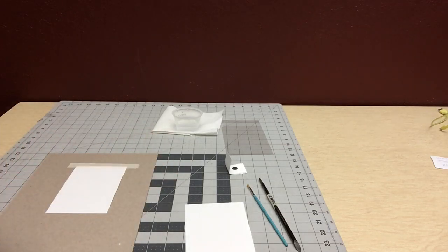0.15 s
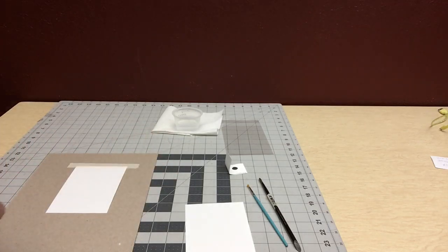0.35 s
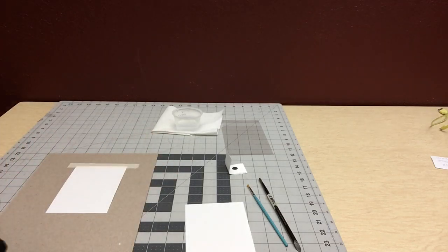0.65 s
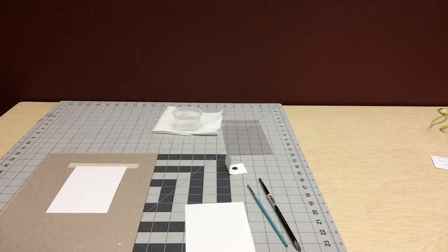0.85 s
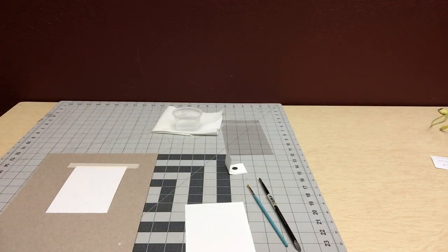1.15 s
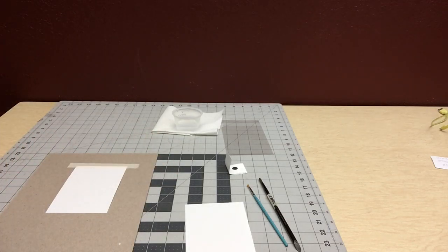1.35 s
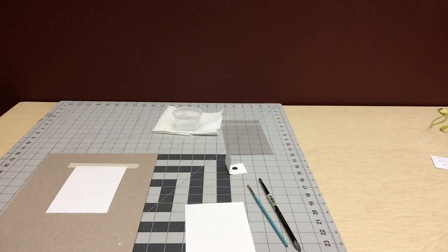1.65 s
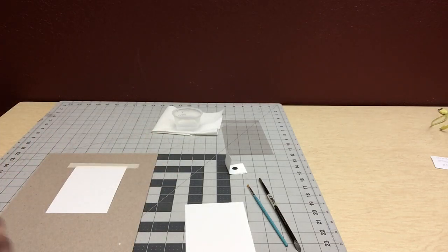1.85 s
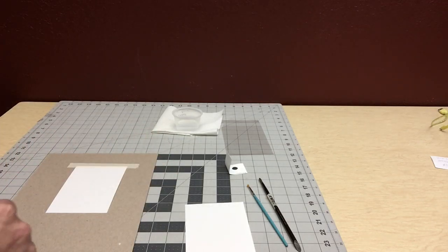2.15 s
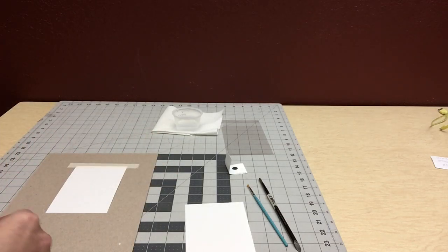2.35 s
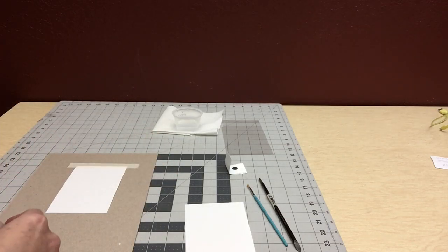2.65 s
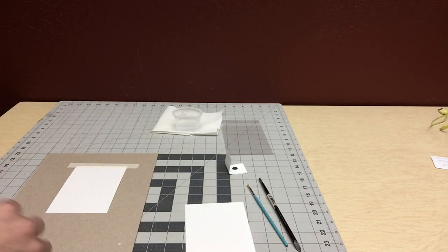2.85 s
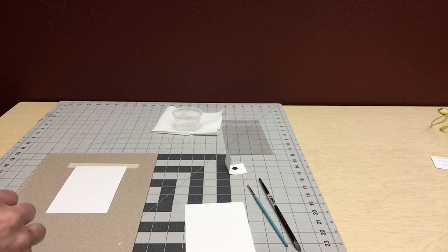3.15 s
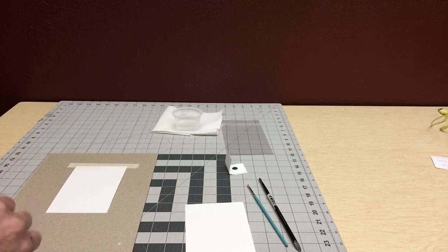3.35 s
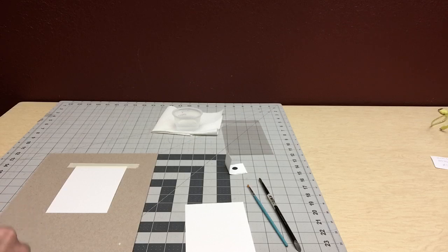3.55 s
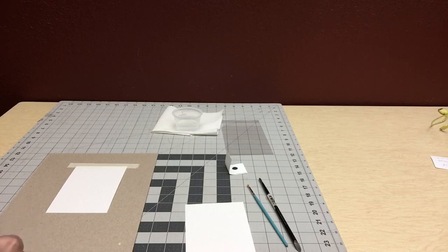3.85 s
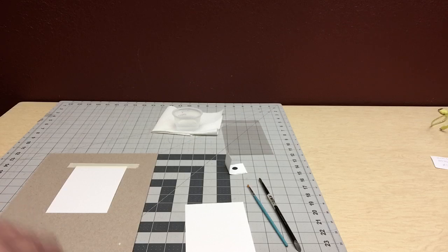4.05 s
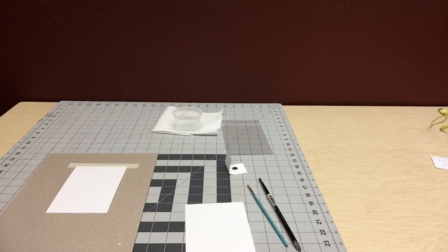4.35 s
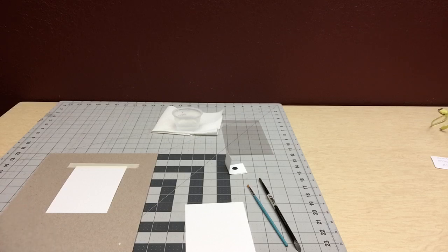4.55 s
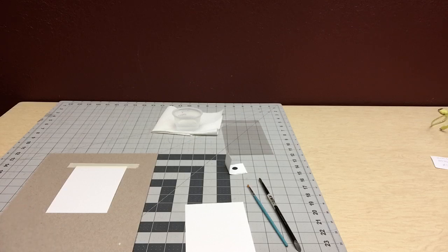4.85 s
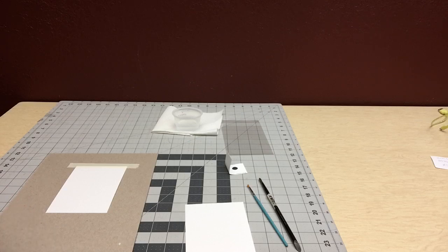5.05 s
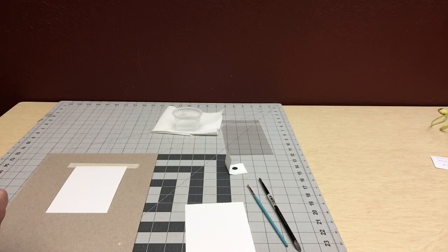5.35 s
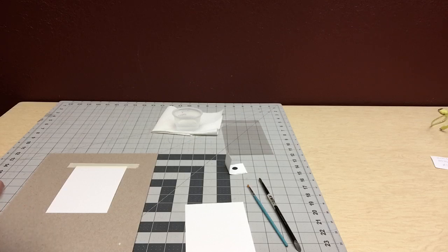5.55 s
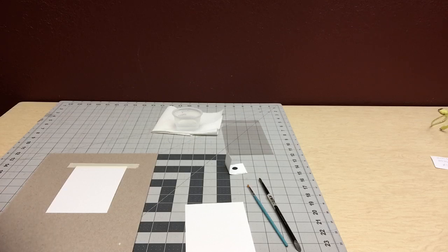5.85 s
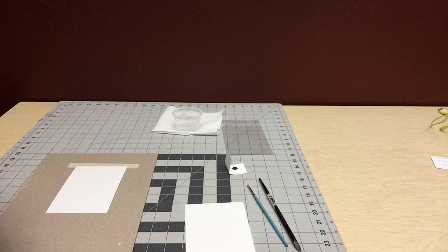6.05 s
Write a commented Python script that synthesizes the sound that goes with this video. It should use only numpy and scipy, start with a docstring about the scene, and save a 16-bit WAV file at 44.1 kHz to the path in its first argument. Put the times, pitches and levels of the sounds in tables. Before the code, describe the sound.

In a small quiet room with a faint low fan hum, masking tape is handled at close range. Light rustles and ticks lead to a bright double rip, the loudest moment, then a dry run of crackling pulls and pops for about a second. The rest is sparse: gentle finger strokes on tape and board, a soft knock, scattered clicks and a short springy flick.

```python
"""Ventilation hums low; close to the microphone a palm and fingers brush tape and board, with small ticks.
Then masking tape is torn and pulled off its roll in short crackling tugs, laid on a board and rubbed down.
Showers of tiny slips make the peeling, tearing and rubbing; short noise bursts make snaps and a few echoes.
Decaying partials make the papery pops, the flick of the stiff strip and the knocks on the board.
The table top and a small room answer tape, hands, flick and snaps."""
import sys
import numpy as np
from scipy import signal
from scipy.fft import rfft, irfft, next_fast_len
from scipy.io import wavfile
from scipy.ndimage import uniform_filter1d, map_coordinates

SR = 44100
rng = np.random.default_rng(int(sys.argv[2]) if len(sys.argv) > 2 else 0)


def store_wav(level_fs):
    """Save 16-bit WAV to argv[1]."""
    pcm = np.round(np.clip(np.atleast_2d(level_fs), -1, 1) * 32767)
    wavfile.write(sys.argv[1], SR, pcm.T.astype(np.int16))


N = 273480  # length in samples


def from_db(db):
    """Decibels to gain."""
    return 10 ** (np.asarray(db) / 20)


def rms_one(x):
    """Scale to unit rms."""
    return x / np.sqrt(np.mean(x ** 2) + 1e-20)


def at_hz(points, hz):
    """Read a table along a log-frequency axis."""
    knots, values = np.transpose(points)
    return np.interp(np.log(np.maximum(hz, 1)), np.log(knots), values)


def add(track, s, sound):
    """Mix a sound into a track from time s on."""
    i = int(np.clip(round(s * SR), 0, N - 1))
    track[i:i + len(sound)] += sound[:N - i]


def coloured(x, spectrum):
    """Causal (minimum-phase) filter with the given (Hz, dB) response, by folding the cepstrum."""
    size = 2 * next_fast_len(len(x) // 2 + 512)
    gain = from_db(at_hz(spectrum, np.fft.rfftfreq(size, 1 / SR)))
    cepstrum = irfft(np.log(gain))
    cepstrum[1:size // 2] *= 2
    cepstrum[size // 2 + 1:] = 0
    response = np.exp(rfft(cepstrum))
    return irfft(rfft(x, size) * response)


def resonance(x, hz, width_hz):
    """Two-pole resonance with gain 1 on top."""
    r = np.exp(-np.pi * width_hz / SR)
    zeros = np.array([1, 0, -1]) * (1 - r * r) / 2
    poles = [1, -2 * r * np.cos(2 * np.pi * hz / SR), r * r]
    return signal.lfilter(zeros, poles, x)


def drift(rate):
    """Random wander of rms 1, with rate turning points drawn a second."""
    knots = rng.standard_normal(4000)
    return rms_one(np.interp(np.arange(N) / SR * rate, np.arange(len(knots)), knots))


def decaying(hz, db, t60):
    """One partial that starts at once and falls by 60 dB in t60 seconds."""
    t = np.arange(SR // 2) / SR
    return from_db(db) * np.sin(2 * np.pi * hz * t) * np.exp(-np.log(1000) * t / t60)


def struck(blows, modes):
    """Each blow (s, dB) sets all the modes (Hz, dB, t60 s) of a body ringing."""
    ring = sum(decaying(hz, db, t60) for hz, db, t60 in modes)
    out = np.zeros(N)
    for s, db in blows:
        add(out, s, from_db(db) * ring)
    return out


def paper_colour(body_db, bite_db, air_db, low_db):
    """Spectrum (Hz, dB) of a narrow paper strip: body below, bite near 3 kHz, air on top."""
    return [(100, body_db + low_db - 10.5), (400, body_db + low_db), (600, body_db + low_db - 8.0),
            (800, body_db - 4.0), (1650, body_db - .5), (2300, (body_db + bite_db) / 2 + 1.5),
            (3000, bite_db), (6500, 0), (11000, air_db - 1.5), (14800, air_db + 0.5)]


def wrinkled(spectrum):
    """The strip is bent differently every time, so broad resonances come and go."""
    ripple_db = 1.2
    hz = np.geomspace(100, 16000, num=36)
    bends = np.clip(rng.standard_normal(len(hz)), -2, 2)
    return np.column_stack([hz, at_hz(spectrum, hz) + ripple_db * bends])


def friction(size, grains_per_s, spread_db, hiss_share):
    """A shower of tiny slips of uneven strength over smooth hiss; rms 1."""
    strengths = from_db(spread_db * np.minimum(rng.exponential(1, size), 4))
    signs = rng.choice([-1, 1], size)
    slips = rms_one(strengths * signs * (rng.random(size) < grains_per_s / SR))
    return rms_one(slips + hiss_share * rng.standard_normal(size))


def crinkles(per_s, spread_db, low_hz, high_hz, width_share):
    """Coarser, separate clicks, each ringing for a moment at one of twelve pitches; rms 1."""
    pitches = np.geomspace(low_hz, high_hz, num=12)
    clicks = friction(N, per_s, spread_db, hiss_share=0)
    dealt = rng.integers(0, len(pitches), N)
    # the tiny offset keeps the filters away from denormal numbers
    return rms_one(sum(resonance(clicks * (dealt == k) + 1e-18, hz, width_share * hz)
                       for k, hz in enumerate(pitches)))


def strokes(rows, surface, rise_share, swell, low_db, catches_per_s, catch_db):
    """Each stroke swells and fades with its speed; its slips bunch up as the surface catches and lets go."""
    out = np.zeros(N)
    rough = surface * rms_one(from_db(catch_db * drift(catches_per_s)))
    for crest, length, level_db, body_db, bite_db, air_db in rows:
        colour = wrinkled(paper_colour(body_db, bite_db, air_db, low_db))
        start = crest - rise_share * length
        end = start + length
        span = np.arange(max(int(start * SR), 0), min(int(end * SR), N))
        speed = np.interp(span / SR, [start, crest, end], [0, 1, 0]) ** swell
        add(out, span[0] / SR, from_db(level_db) * coloured(speed * rough[span], colour))
    return out


def ventilation(waver_hz):
    """A fan tone wavering in pitch and level, over filtered noise for duct rumble and faint hiss."""
    # Each row: time in seconds, rms level of the fan tone in dB ahead of trim and swing.
    hum_levels = [(0.0, -58.5), (0.12, -52.5), (1.36, -55), (1.4, -75), (1.48, -55), (2.52, -55),
                  (2.54, -54), (3.25, -53), (3.33, -57.5), (3.49, -54), (3.54, -56), (3.63, -47.5),
                  (3.68, -52.5), (4.49, -54), (4.61, -63.5), (4.65, -58.5), (6.17, -51), (6.2, -63)]
    # Low noise of the duct. Each row: frequency in Hz, filter gain in dB ahead of rumble_db.
    rumble_gains = [(28, -26.5), (45, -17), (68, 1), (92, -3), (125, -3.5), (138, 3.5), (155, -6),
                    (175, -3), (220, -9), (278, -15), (305, -5.5), (370, -17.5), (480, -26.5), (900, -37)]
    # Steady hiss. Each row: frequency in Hz, filter gain in dB on white noise of rms 1.
    hiss_gains = [(100, -72.5), (700, -66.5), (1400, -69), (2500, -73.5), (6000, -78), (16000, -84.5)]
    hum_hz, trim_db, swing_db, swings_per_s, rumble_db = 107, -0.95, 1.5, 6.3, -31
    phase = 2 * np.pi * np.cumsum(hum_hz + waver_hz * drift(5.4)) / SR
    hum_db = np.interp(np.arange(N) / SR, *np.transpose(hum_levels))
    hum_db = hum_db + trim_db + swing_db * drift(swings_per_s)
    hum = np.sqrt(2) * np.sin(phase) * from_db(hum_db)
    rumble = coloured(rng.standard_normal(N), rumble_gains + [(4000, -82)])[:N]
    hiss = coloured(rng.standard_normal(N), hiss_gains)[:N]
    return hum + from_db(rumble_db) * rumble + hiss


def handling(shifts_per_s, shift_db):
    """The held strip rustles faintly, coming and going as the grip shifts."""
    # Each row: time in seconds, rustle level in dB ahead of the grip shifts and paper colour.
    rustle_levels = [(0, -72), (.2, -78.5), (.6, -67.5), (.93, -63), (1.1, -65), (1.29, -55), (1.66, -67),
                     (1.75, -60), (1.85, -64), (2.19, -71.5), (2.32, -64), (2.6, -81.5), (2.95, -67.5),
                     (3.42, -87), (3.72, -70), (4.1, -82), (4.65, -77.5), (5.3, -70.5), (5.42, -68),
                     (5.68, -88.5), (6.2, -65.5)]
    crepe = friction(N, grains_per_s=2000, spread_db=1.0, hiss_share=0.81)
    level_db = np.interp(np.arange(N) / SR, *np.transpose(rustle_levels))
    level_db = level_db + shift_db * drift(shifts_per_s)
    colour = paper_colour(body_db=-8.5, bite_db=-3.5, air_db=2, low_db=10.5)
    return coloured(from_db(level_db) * crepe, colour)[:N]


def palm():
    """The palm slides softly on the board: friction strokes with the treble cut."""
    # Each row: crest in seconds, length in seconds, level in dB ahead of colour and treble cut.
    slide_rows = [(0.01, 0.36, -65.5), (0.196, 0.032, -63), (3.969, 0.033, -67), (4.005, 0.07, -69),
                  (4.984, 0.086, -64), (5.414, 0.024, -60), (5.461, 0.11, -61.5), (5.978, 0.084, -68.5)]
    body_db, bite_db, air_db, cut_hz = 11.5, 0, 16, 5000
    board = friction(N, grains_per_s=4000, spread_db=2, hiss_share=.8)
    rows = [(*row, body_db, bite_db, air_db) for row in slide_rows]
    slides = strokes(rows, board, rise_share=0.58, swell=1, low_db=5.5, catches_per_s=170, catch_db=3.5)
    return signal.sosfilt(signal.butter(2, cut_hz, fs=SR, output="sos"), slides)


def fingers():
    """Fingers brush over the crepe in short strokes: fine friction with coarser crinkles."""
    # Each row: crest in seconds, length in seconds, level in dB ahead of colour, then the
    # body, bite and air of that colour in dB.
    rub_rows = [(.265, 0.07, -53, -1, -8, 0), (.38, 0.072, -59.5, -2, -6, -4),
                (.493, 0.053, -59, -5, -7, 4), (.56, 0.17, -64, -8, -7, 5),
                (.69, 0.019, -49.5, -4.5, -4.5, -2), (.835, 0.096, -48, -10.5, -4, -7),
                (.875, 0.15, -57.5, -8, -7, 5), (.985, 0.074, -56.5, 2, 0, 1),
                (2.055, 0.07, -60.5, -10, 0, 3), (2.365, 0.075, -61.5, -5, 3, 4),
                (2.543, 0.052, -53.5, -10, -3.5, 6.5), (2.696, .11, -52, -4.5, 1.5, 2.5),
                (2.84, 0.053, -58.5, -6, -4, 4.5), (2.98, 0.072, -60, -1, -3, 7),
                (3.058, 0.076, -58, -16, -7, -3), (3.134, 0.051, -48, -13, -11, -1.5),
                (3.19, 0.12, -57, -9, -5.5, 3.5), (3.4, 0.083, -62.5, -7, -5, 2.5),
                (3.518, 0.073, -62.5, -1, -7, 3.5), (3.65, 0.16, -66.5, 2, -0.5, 0.5),
                (3.815, 0.19, -67.5, 0, -1, -1), (4.015, .04, -69.5, -11, -4, 0),
                (4.775, 0.039, -56.5, -20, -10, 1), (4.828, 0.11, -42.5, -6, -1.5, 3),
                (5.045, 0.14, -59, -10, -5, -1.5), (5.452, 0.081, -53, -10, 7.5, -17),
                (5.825, 0.054, -67, -10, -7, 1), (6.07, 0.069, -56.5, -17, -13, 3)]
    crinkle_db = -8.5
    crepe = friction(N, grains_per_s=2400, spread_db=0.5, hiss_share=0.94)
    coarse = crinkles(per_s=330, spread_db=1.5, low_hz=1766, high_hz=10700, width_share=0.1)
    return strokes(rub_rows, crepe + from_db(crinkle_db) * coarse, rise_share=0.53, swell=0.93,
                   low_db=3.0, catches_per_s=180, catch_db=2.0)


def knocks():
    """Light knocks set the modes of the board ringing."""
    # Each row: time in seconds, level in dB.
    knock_rows = [(.257, -67), (2.0893, -57), (2.0965, -67), (3.131, -89), (5.475, -76)]
    # Each row: board mode in Hz, level in dB relative to the knock, 60 dB decay in seconds.
    board_modes = [(482, 5.5, 0.069), (764, 5, 0.088), (870, -1, 0.044), (1520, -0.5, .03), (2630, 3, .028),
                   (3240, 7.5, 0.021), (4100, 2, 0.021)]
    return struck(knock_rows, board_modes)


def flicks():
    """A flick sets the modes of the stretched strip ringing."""
    # Each row: time in seconds, level in dB.
    flick_rows = [(5.186, -40.5)]
    # Each row: strip mode in Hz, level in dB relative to the flick, 60 dB decay in seconds.
    strip_modes = [(2380, -21, .08), (2510, -10, .045), (2567, -5, .036), (2620, -21, .15),
                   (2800, -3, 0.026), (4060, -8, 0.02), (6100, -10, .011)]
    return struck(flick_rows, strip_modes)


def pops():
    """The strip buckles with papery pops: each rings for about twenty cycles, with one overtone."""
    # Each row: time in seconds, level in dB, pitch in Hz.
    pop_rows = [(.351, -44.5, 2900), (0.688, -57, 2820), (1.0165, -28, 4900), (1.0464, -33, 1730),
                (1.047, -36.5, 1210), (1.0495, -45, 980), (1.0503, -28, 5160), (1.058, -26, 6350),
                (1.378, -32, 2130), (1.5335, -44, 3600), (1.699, -37, 4000), (2.358, -53, 2350),
                (2.97, -57, 1230), (2.974, -54, 2020), (3.06, -48, 6450), (3.119, -50, 2550),
                (3.134, -48, 1880), (3.96, -61, 2280), (3.965, -56, 2000), (4.159, -57.5, 1320),
                (4.213, -52, 1830), (4.8, -44, 3850), (5.315, -69, 2900), (5.52, -53, 1600)]
    cycles, overtone, overtone_db = 20.4, 2.25, -7.5  # cycles to fall by 60 dB; multiple of the pitch
    out = np.zeros(N)
    for s, db, hz in pop_rows:
        upper_hz = overtone * hz
        out += struck([(s, db)], [(hz, 0, cycles / hz), (upper_hz, overtone_db, cycles / upper_hz)])
    return out


def snaps(low_db):
    """Strip snaps, fingertip ticks and strong table echoes: noise that starts at once and soon fades."""
    # The rows at 4.5982, 4.7672 and 6.0662 s are strong table echoes of the snap 3 ms before.
    # Each row: time in seconds, time constant in seconds of the noise that is then flattened in
    # spectrum, level in dB ahead of colour, then the body, bite and air of that colour in dB.
    snap_rows = [(0.256, 0.00085, -27.5, 6, -2, -5), (.351, 0.0026, -27.5, -0.5, 4.5, -6),
                 (.488, .0015, -36.5, -19, -5, 9), (.679, .001, -41, -15, -11, -1),
                 (1.0161, 0.00082, -12, -3.5, -6, -13), (1.0343, .0009, -15, -13, -4, 5),
                 (1.0447, 0.0015, -8, -0.5, -2, -7), (1.0463, .0014, -9, 2.5, 3, 0.5),
                 (1.05, 0.00058, -10.5, -1, -1, -9), (1.1885, .0006, -33, 0, -2, 3),
                 (1.1958, 0.00067, -21, -6, 4, 2), (1.215, 0.00048, -21.5, -6, 9.5, 2),
                 (1.2257, 0.00059, -19.5, -9, -4, 2), (1.3531, 0.0008, -19.5, 8, 3, -2),
                 (1.3593, 0.00056, -23, 7, 2, 1), (1.375, 0.00074, -23.5, 6.5, 7, 1),
                 (1.393, .0007, -22.5, 7, 7, 3), (1.4403, .0005, -20, 2, -4, -15),
                 (1.5048, .0005, -21, -14, 4, -5), (1.5258, .0003, -17, -13, -6, -4),
                 (1.5326, .0005, -24, -7, -4, -1), (1.5878, 0.00025, -18, -11, -10, 2),
                 (1.593, 0.00095, -6.5, -14, -5.5, -2.5), (1.6814, 0.00045, -25, -12, 5, 2),
                 (1.6836, 0.0011, -23.5, -7, -1, 6), (1.698, 0.00056, -26, -6, -2, -6),
                 (1.9252, .0003, -20, -31, 0, -2), (1.9346, 0.00022, -15.5, -23, -0.5, 6.5),
                 (1.936, 0.00018, -31, -13, -6, 10), (1.9516, 0.00032, -23, -9, 2, 6),
                 (1.967, 0.00044, -27, 3.5, -5, 4), (2.0882, 0.0023, -26.5, 1.5, 3, 5.5),
                 (2.35, 0.0017, -32, .5, 4, 4), (2.534, .0015, -36, -5, 0, 6),
                 (2.779, .0005, -50, -4, -5, 11), (3.119, 0.0018, -34.5, -3, 0, -5),
                 (3.129, 0.0011, -30, -6, 0, 1), (3.5013, .0003, -33, -12, -15, -4),
                 (3.5032, .0004, -30.5, -9, -10, 2), (4.158, 0.0017, -49, 16, 1, -5),
                 (4.2129, 0.0017, -38.5, 7, 9.5, -1), (4.595, .0007, -27, -8.5, 1, -2),
                 (4.5982, 0.00066, -28, -9, -5, 3.5), (4.764, 0.00046, -27, -7, 0, 2),
                 (4.7672, .0004, -25.5, -17, -5, -1), (4.808, .0008, -25, -8, 0, -1),
                 (4.814, 0.0008, -26, -4, 3, 4), (5.1865, 0.00076, -17, -18, 0.5, 0),
                 (5.288, 0.0012, -30.5, 0, 0, 3), (5.4557, 0.00066, -33, 7, 8.5, -12),
                 (5.5211, 0.00013, -26, -2, -2, 1.5), (5.956, .001, -54.5, 6, 3, -2),
                 (6.063, 0.00059, -23, -15, -15, -6), (6.0662, 0.00054, -23.5, -20, -15, -2)]
    out = np.zeros(N)
    t = np.arange(0, .012, 1 / SR)
    for s, fade_s, level_db, body_db, bite_db, air_db in snap_rows:
        fade = np.exp(-t / fade_s)
        splinters = rfft(rng.standard_normal(len(t)) * fade)
        # keep the phases alone, so all frequencies are equally strong, then fade gently
        crack = irfft(splinters / np.abs(splinters), len(t)) * fade ** .3
        colour = wrinkled(paper_colour(body_db, bite_db, air_db, low_db))
        add(out, s, from_db(level_db) * coloured(crack / np.linalg.norm(crack), colour))
    return out


def roll(x):
    """The cardboard core resonates along with the tape."""
    # Each row: resonance in Hz, width in Hz, level in dB.
    roll_modes = [(750, 95, 3), (1296, 130, 1), (1747, 76, 2.5), (4480, 500, -8), (6200, 370, -17)]
    return x + sum(from_db(db) * resonance(x, hz, width_hz) for hz, width_hz, db in roll_modes)


def tearing():
    """Paper fibres break in a dense, ragged burst; whole bundles give way with ringing clicks."""
    # Rips start quickly and run out. Each row: crest in seconds, length in seconds, level in dB
    # ahead of colour and roll, then the body, bite and air of that colour in dB.
    rip_rows = [(1.019, 0.065, -38.5, -2, -7.5, 1), (1.0465, 0.016, -28, -2.5, -4, 2),
                (1.602, .038, -41.5, -17, -25, 4), (1.687, .041, -50.5, -1, -1, 9.5),
                (4.6, 0.036, -58, -17, -15, 6.5)]
    bundle_db = -5  # against single fibres
    fibres = friction(N, grains_per_s=3600, spread_db=3.0, hiss_share=0.097)
    bundles = crinkles(per_s=390, spread_db=-5.0, low_hz=2040, high_hz=9700, width_share=0.25)
    paper = rms_one(fibres + from_db(bundle_db) * bundles)
    return roll(strokes(rip_rows, paper, rise_share=0.16, swell=0.99,
                        low_db=-7.0, catches_per_s=420, catch_db=2.5))


def peeling():
    """The glue lets go in a crackle with every pull; the taut tape and the roll sing along."""
    # Each row: crest in seconds, length in seconds, level in dB ahead of colour and resonances,
    # then the body, bite and air of that colour in dB.
    tug_rows = [(1.217, 0.075, -44, -4, -2.5, 5), (1.385, 0.049, -46, -3, -3, 3.5),
                (1.435, 0.085, -50, -6.5, 0, 2.5), (1.53, .11, -42, -9, -1.5, 2.5),
                (1.95, .1, -54, -3.5, -6, 9.5)]
    crinkle_db, taut_hz, taut_width_hz, taut_db = -5.5, 2400, 190, 1.5
    glue = friction(N, grains_per_s=3700, spread_db=0.5, hiss_share=0.42)
    coarse = crinkles(per_s=250, spread_db=3.0, low_hz=1440, high_hz=8950, width_share=0.23)
    pulls = strokes(tug_rows, glue + from_db(crinkle_db) * coarse, rise_share=0.7, swell=0.96,
                    low_db=5.5, catches_per_s=140, catch_db=2.0)
    return roll(pulls) + from_db(taut_db) * resonance(pulls, taut_hz, taut_width_hz)


def past_hand(x):
    """A very short echo off the moving hand combs the sound and shifts its colour; the level about stays."""
    echo_s, swing, moves_per_s, echo_db = .00042, .35, 22, -10  # swing: spread of the log delay
    now, gain = np.arange(N), from_db(echo_db)
    lag = echo_s * SR * np.exp(swing * drift(moves_per_s))
    echo = map_coordinates(x, [now - lag], order=3)
    return (x + gain * echo) / np.hypot(1, gain)


def evened(tail):
    """Level a diffuse tail over 400 Hz wide stretches, then give it the tone of the room."""
    # Each row: frequency in Hz, tone of the echo in dB.
    room_tone = [(300, 0), (600, -0.5), (1100, 1.5), (2500, -0.5), (6000, 0), (15000, 1)]
    hz = np.fft.rfftfreq(len(tail), 1 / SR)[1:]
    power = uniform_filter1d(np.abs(rfft(tail)[1:]) ** 2, size=200)
    level_db = 10 * np.log10(power + 1e-9)
    return coloured(tail, np.column_stack([hz, at_hz(room_tone, hz) - level_db]))[:len(tail)]


def room(x, early_db, early_s):
    """One bounce off the table, then a cluster from the near walls and a tail whose treble dies first."""
    # Each row: frequency in Hz, time in seconds for the tail to fall by 60 dB.
    decay_times = [(300, 0.32), (1300, 0.6), (3500, 0.36), (8000, 0.27), (15000, 0.19)]
    table_s, table_db, wall_s, wall_db = .0032, -11.5, .0068, -2  # echo delays and levels
    t = np.arange(SR // 2) / SR
    edges = np.geomspace(150, 19000, num=9)
    tail = np.zeros(len(t))
    for low, high in zip(edges, edges[1:]):
        band_filter = signal.butter(2, [low, high], "band", fs=SR, output="sos")
        band = signal.sosfilt(band_filter, rng.standard_normal(len(t)))
        tail += band * np.exp(-np.log(1000) * t / at_hz(decay_times, np.sqrt(low * high)))
    tail *= 1 + from_db(early_db) * np.exp(-t / early_s)
    tail = evened(tail)
    out = np.zeros(N)
    add(out, table_s, from_db(table_db) * x)
    add(out, wall_s, from_db(wall_db) * signal.fftconvolve(x, tail / np.linalg.norm(tail)))
    return out


def scene():
    """Tape and hands close to the microphone; each place on the table has its own echoes."""
    background = ventilation(waver_hz=1.61)
    hands = past_hand(handling(shifts_per_s=16, shift_db=1.5) + palm() + fingers())
    knocking, flick = knocks(), flicks()
    cracks = pops() + snaps(low_db=-3.5)
    tape = past_hand(tearing() + peeling())
    # what each place sends into the room
    places = (from_db(1.5) * tape, from_db(-3.0) * hands + flick, from_db(1) * cracks)
    echoes = sum(room(x, early_db=7.5, early_s=0.0022) for x in places)
    return (tape + hands + cracks + flick + knocking + echoes + background)[None]


def record(dry):
    """The top is cut steeply above 16 kHz."""
    return signal.sosfilt(signal.ellip(10, .1, 70, 16000, fs=SR, output="sos"), dry)


dry = scene()
out = record(dry)
store_wav(out)
```